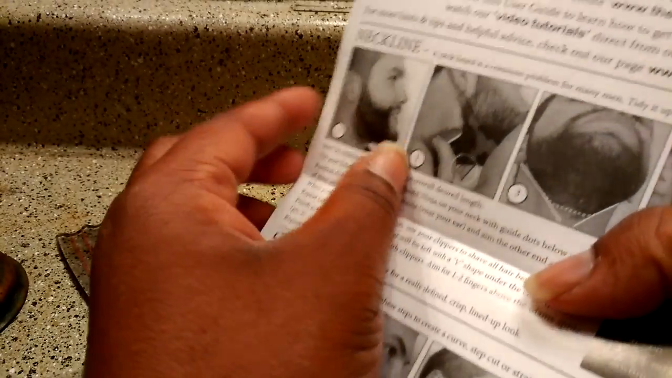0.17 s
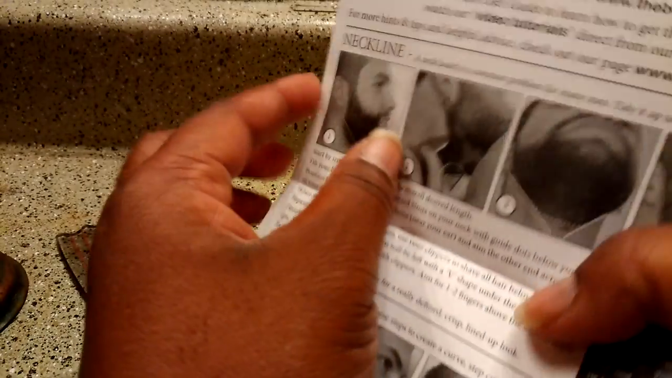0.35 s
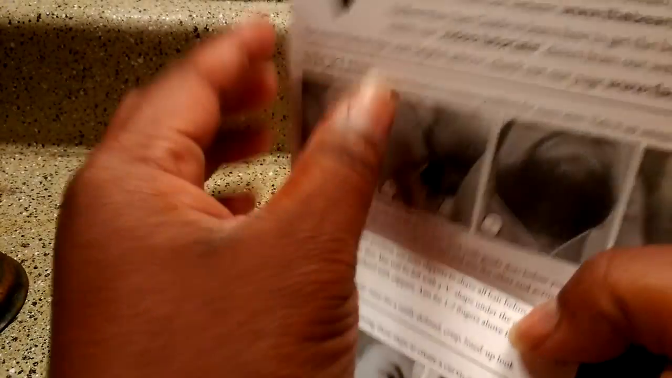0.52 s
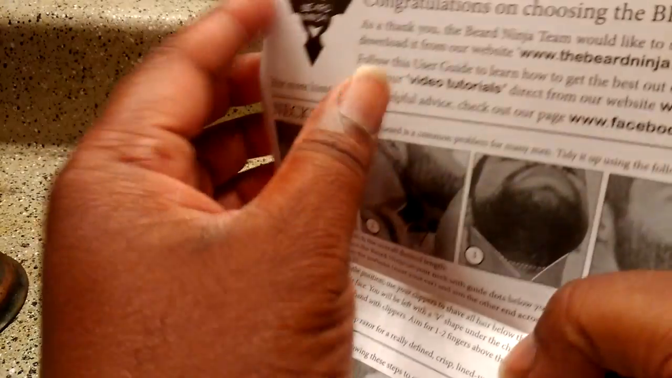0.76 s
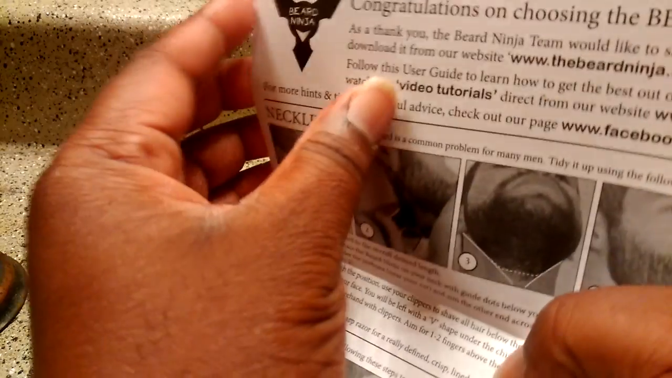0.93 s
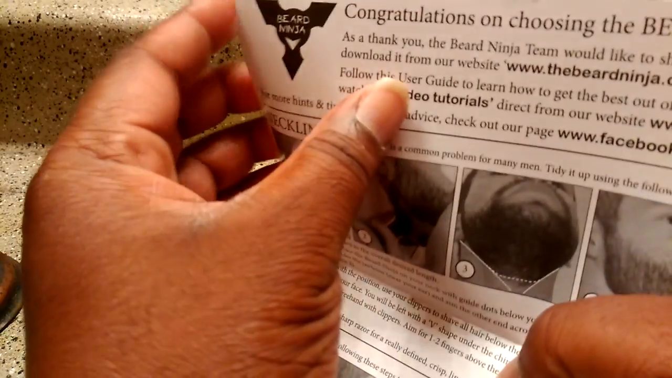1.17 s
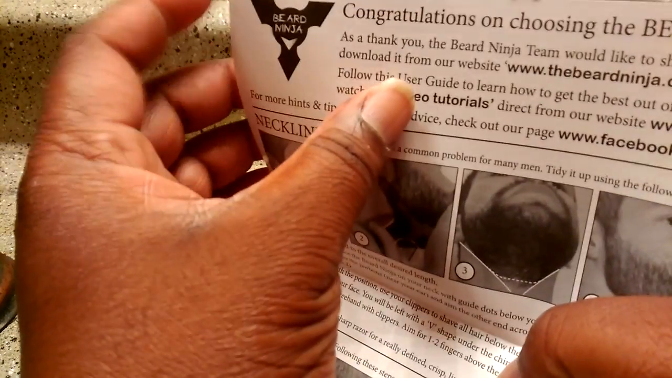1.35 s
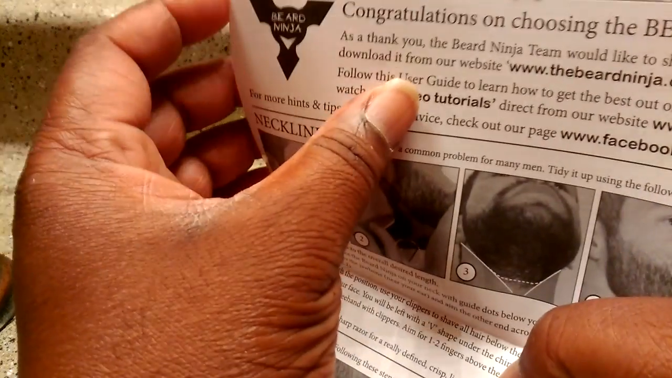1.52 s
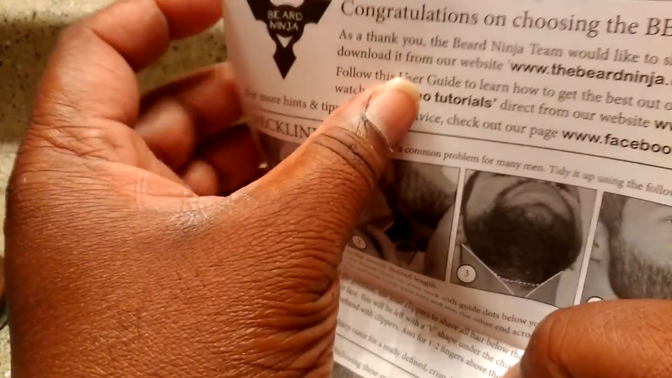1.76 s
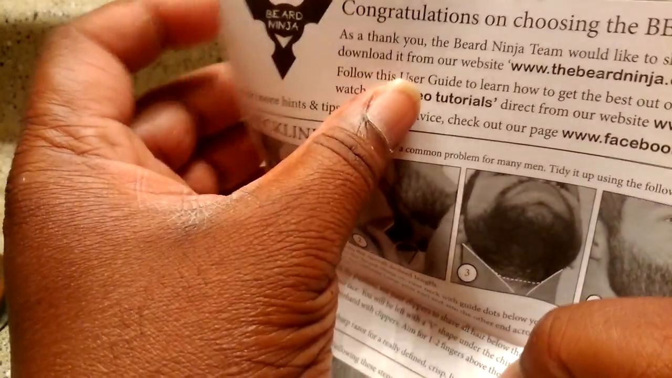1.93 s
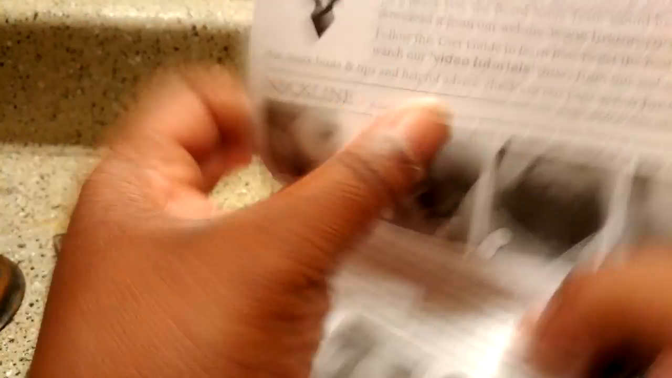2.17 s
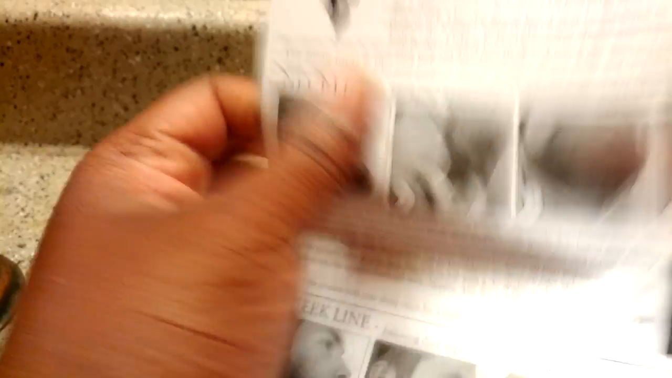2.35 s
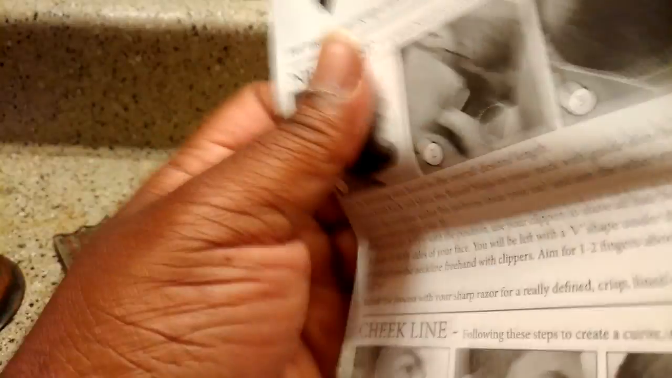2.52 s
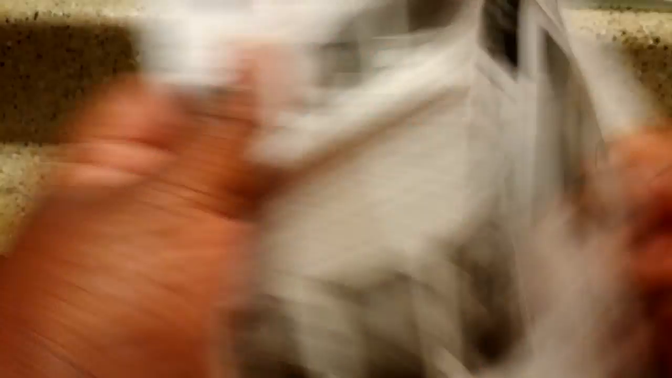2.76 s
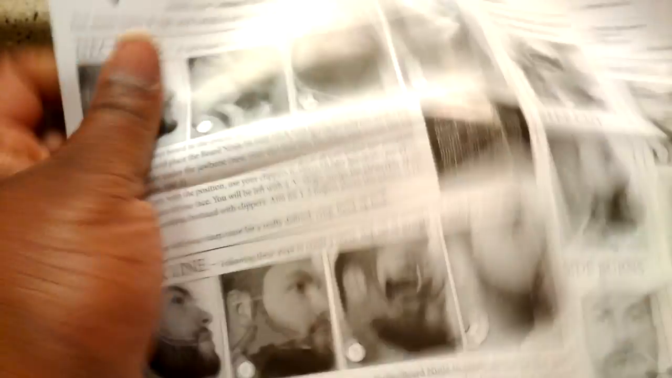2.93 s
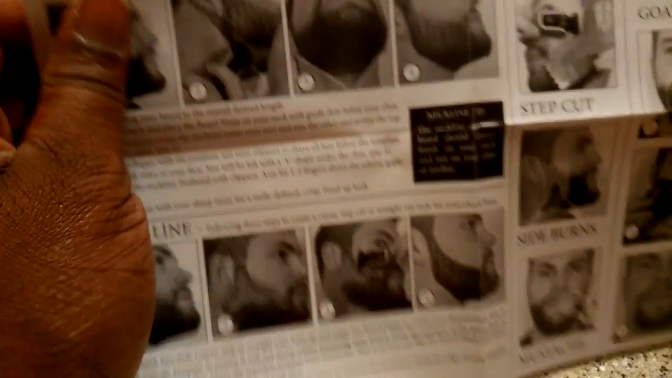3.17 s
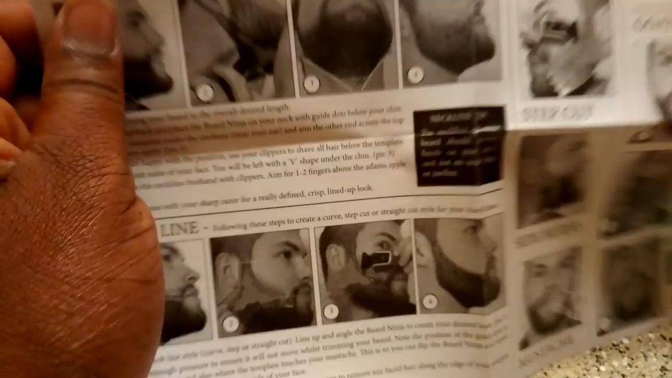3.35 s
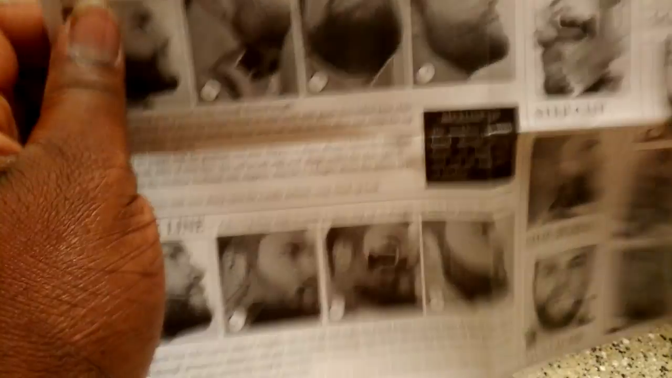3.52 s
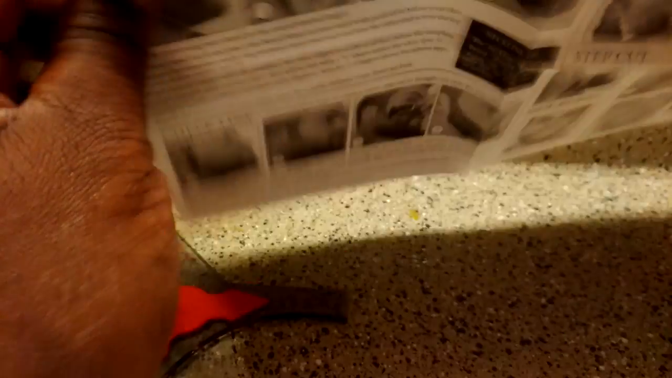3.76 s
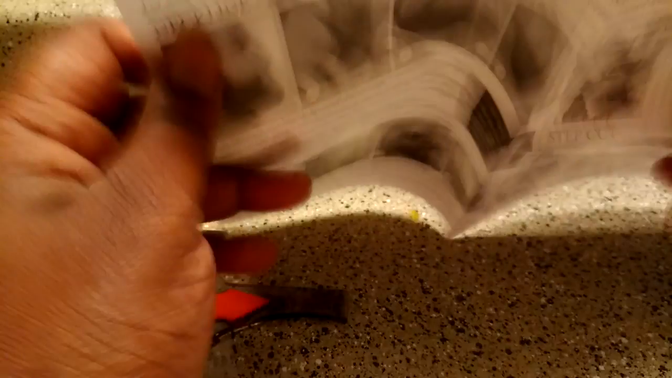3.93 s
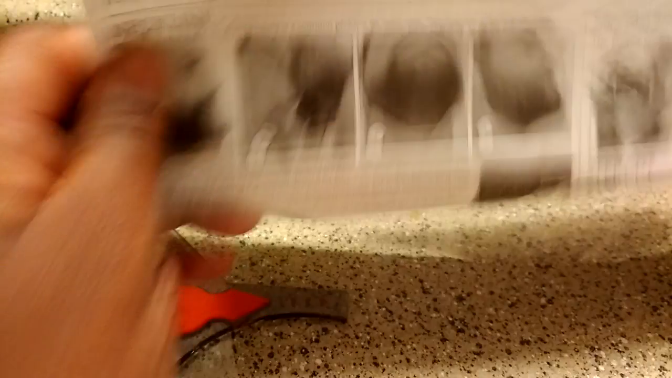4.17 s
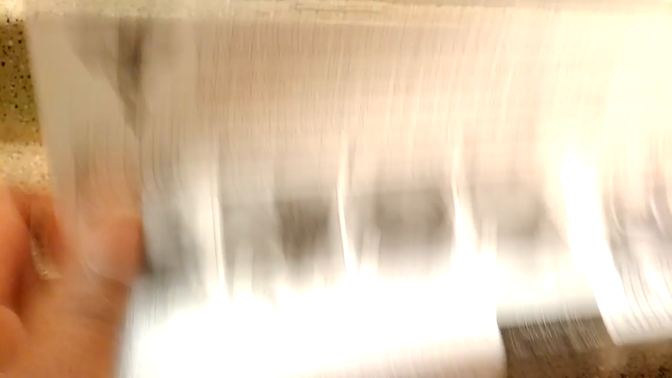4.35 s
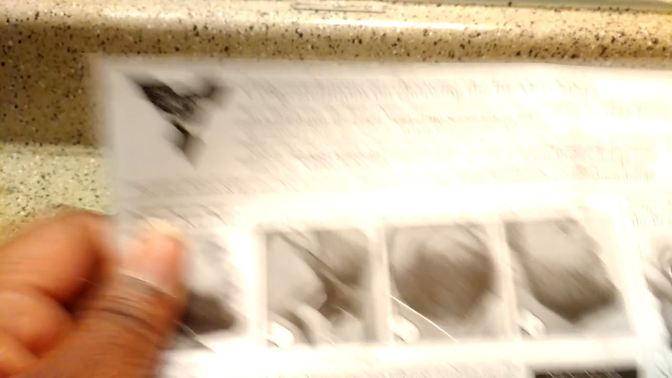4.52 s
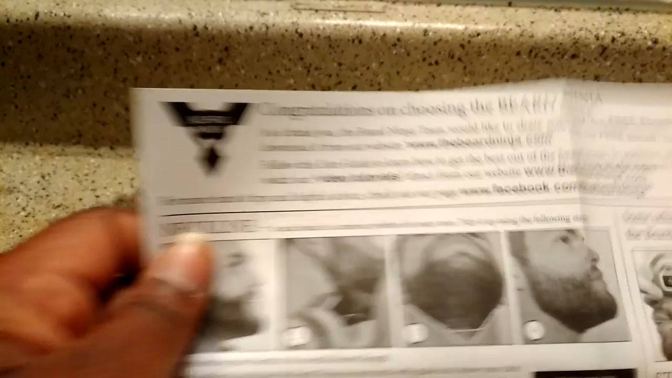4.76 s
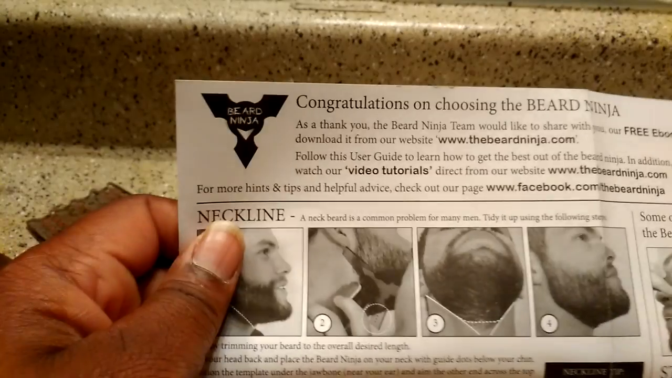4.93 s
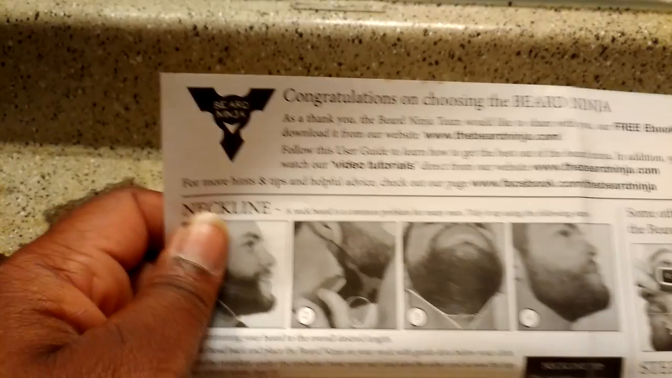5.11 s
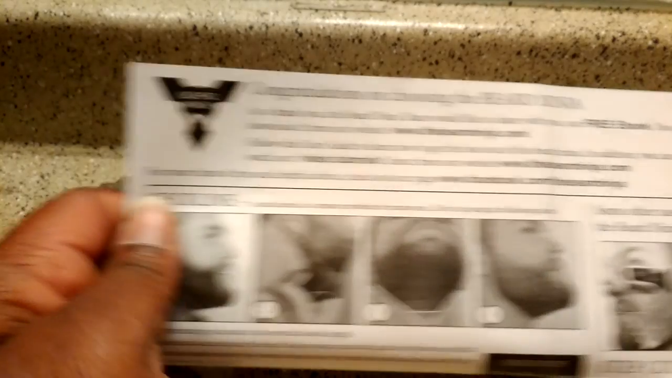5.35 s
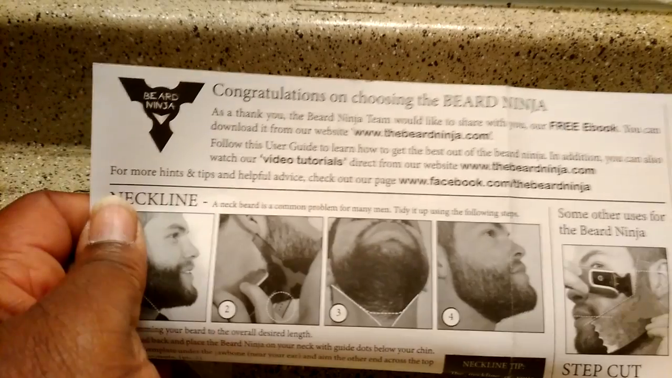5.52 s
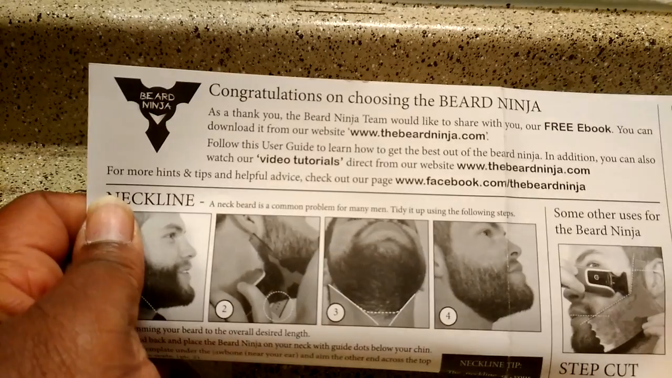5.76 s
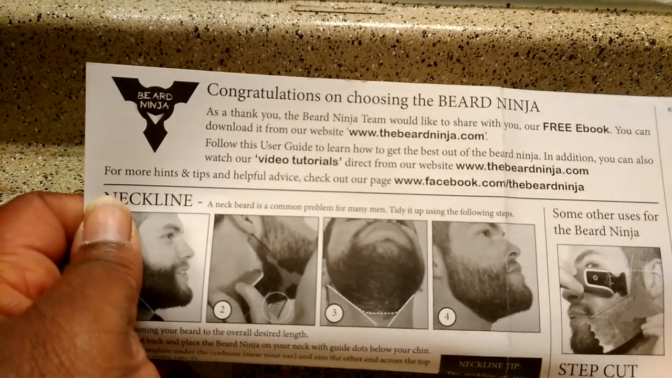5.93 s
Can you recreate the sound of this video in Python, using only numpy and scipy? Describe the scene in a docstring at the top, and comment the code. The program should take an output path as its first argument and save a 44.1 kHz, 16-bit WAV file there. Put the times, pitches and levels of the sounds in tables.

```python
"""Paper leaflet in two hands

Two hands unfold and turn a printed leaflet close to a small two-port recorder in a quiet room.
Rubbing is slip noise, bending is clumped grains through the sheet's modes, flapping is low noise.
Creases snap as short bursts; panels pop as jerks ringing in resonances. The sheet is nearer the left
port: the right hears it later, duller and reversed. Delays echo it over hiss, a hum and a rumble."""
import sys
import numpy as np
from scipy import signal
from scipy.fft import rfft, irfft, next_fast_len
from scipy.io import wavfile

SR = 44100
rng = np.random.default_rng(int(sys.argv[2]) if len(sys.argv) > 2 else 0)


def transcribe(u):
    """Save the signal u as a 16-bit wav file named by the first command-line argument.

    u: samples, shape (n,) or (channels, n), limited to [-1, 1]; the rate is SR.
    q: integer samples, one column per channel.
    """
    v = np.clip(np.atleast_2d(u).T, -1, 1)
    q = np.round(v * 32767).astype(np.int16)
    wavfile.write(sys.argv[1], SR, q)


N = 264065


def paper():
    """One draw of all that the sheet sends out: friction, bending, flapping, snaps and pops."""
    return rubbing() + bending() + flapping() + snaps() + pops()


# moves of the hands: (peak time [s], swell [s], hold [s], rubbing hiss [dB],
# top sheen [dB re hiss], bending rustle [dB])
HAND_MOVES = [(0.102, 0.003, 0, -70, -6, -55.5), (0.216, 0.013, 0.028, -54.5, -31, -75),
              (0.332, 0.025, 0, -53.5, 5.5, -57.5), (0.44, 0.34, 0.23, -88, -12, -67.5),
              (0.639, 0.045, 0.052, -39.5, -0.5, -63), (0.694, 0.11, 0.018, -42.5, -12, -48),
              (0.791, 0.12, 0.21, -69, -11, -66), (1.211, 0.009, 0, -35, 3.5, -49),
              (1.26, 0.003, 0, -40, 3, -69), (1.609, 0.064, 0.021, -39.5, -10, -70),
              (1.738, 0.064, 0.014, -43, -12, -69.5), (1.892, 0.056, 0.014, -35.5, -6.5, -51),
              (1.967, 0.036, 0.016, -28, -3, -56), (2.045, 0.097, 0.041, -23, -5, -35),
              (2.129, 0.041, 0.055, -32, -10, -42.5), (2.253, 0.22, 0.053, -34, -4, -50),
              (2.33, 0.022, 0.0083, -28, -1.5, -33), (2.401, 0.024, 0.062, -32, 0, -38),
              (2.474, 0.029, 0.048, -29.5, -7, -37), (2.579, 0.096, 0.042, -34.5, -2, -32),
              (2.659, 0.038, 0.049, -32.5, 0.5, -39.5), (2.725, 0.017, 0.024, -33.5, -3, -39.5),
              (2.839, 0.12, 0, -23, -8.5, -28), (2.847, 0.011, 0.0033, -16, -15, -24.5),
              (2.907, 0.071, 0.029, -23, -10.5, -27), (2.978, 0.048, 0.072, -32, -5, -36),
              (3.285, 0.012, 0.041, -31.5, -6, -37), (3.448, 0.003, 0, -29.5, -7, -34),
              (3.476, 0.029, 0, -16, -13.5, -28), (3.528, 0.05, 0.049, -55, 8.5, -49),
              (3.619, 0.024, 0.068, -43.5, -44, -48), (3.8, 0.027, 0.042, -37, -2.5, -50),
              (3.847, 0.015, 0.035, -28, 0.5, -31.5), (3.954, 0.039, 0.016, -26, -1.5, -50.5),
              (4.012, 0.014, 0.025, -21.5, -9.5, -33.5), (4.096, 0.0064, 0.047, -25.5, -1.5, -29),
              (4.154, 0.0071, 0.014, -18.5, -20.5, -13), (4.23, 0.43, 0.053, -25, -9, -29.5),
              (4.355, 0.094, 0.033, -18.5, -9.5, -39.5), (4.433, 0.052, 0.094, -42, -2, -79),
              (4.616, 0.013, 0.036, -49.5, -22, -49.5), (4.69, 0.006, 0.089, -48.5, -7, -55.5),
              (4.778, 0.07, 0.095, -34, -1, -64), (4.95, 0.0027, 0.042, -49, 9.5, -68),
              (5.077, 0.0033, 0.023, -41.5, 5, -72), (5.195, 0.02, 0, -45, -21, -37.5),
              (5.26, 0.0081, 0.005, -35.5, -1, -69.5), (5.365, 0.089, 0.012, -58, -6, -58),
              (5.451, 0.026, 0.042, -41.5, -6.5, -57), (5.545, 0.21, 0.0, -62, -16, -48),
              (5.808, 0.0034, 0.021, -56, 8, -84), (5.93, 0.095, 0, -58.5, -8, -71.5)]
SWELL_DB = 30   # climbed during the swell


def move_gain(level_db, fall_db_per_s):
    """Gain of one layer: the powers of all moves added, each swelling to its peak, holding and falling."""
    peak_s, swell_s, hold_s = np.array(HAND_MOVES).T[:3, :, None]
    t = np.arange(0, N, 64) / SR   # one point every 64 samples
    rise_db = SWELL_DB * np.minimum(t - peak_s, 0) / swell_s
    fall_db = fall_db_per_s * np.maximum(t - peak_s - hold_s, 0)
    power = np.sum(from_db(level_db[:, None] + rise_db - fall_db) ** 2, axis=0)
    return np.interp(np.arange(N) / SR, t, np.sqrt(power))


# tone of fingers and folds rubbing: (frequency [Hz], relative density [dB per Hz])
RUB_COLOUR = [(880, -51), (1500, -34.5), (2040, -15), (3000, -11), (3590, -10), (3880, -14.5), (4460, -9.5),
              (5770, -6), (8660, -2), (15100, -14.5), (16000, 2)]
# where the hiss ends and the sheen begins: (frequency [Hz], gain [dB])
BELOW_SHEEN = [(8000, 0), (13000, -30)]
CATCH_DB, CATCH_RATE_HZ = 1.8, 120   # the fingers catch and slip unevenly
HISS_FALL_DB_PER_S, SHEEN_FALL_DB_PER_S = 272.5, 293


def rubbing():
    """Friction slips split into hiss and top sheen, with small creases giving way under the fingers."""
    hiss_db, sheen_re_hiss_db = np.array(HAND_MOVES).T[3:5]
    slips = rms_one(colour(patchy(grains(4000, 2.0, 4.6)), RUB_COLOUR))
    slips = slips * from_db(CATCH_DB * drift(CATCH_RATE_HZ))
    hiss = colour(slips, BELOW_SHEEN)
    sheen = rms_one(slips - hiss)
    rub = (hiss + 0.21 * crinkles(270)) * move_gain(hiss_db, HISS_FALL_DB_PER_S)
    return rub + sheen * move_gain(hiss_db + sheen_re_hiss_db, SHEEN_FALL_DB_PER_S)


def grains(per_s, spread_db, clump_db):
    """Tiny slips at random times and sizes, coming in clumps, over a smooth friction noise."""
    sizes = from_db(spread_db * np.minimum(rng.exponential(1, N), 4)) * rng.choice([-1, 1], N)
    born = rng.random(N) < per_s * from_db(clump_db * drift(40)) / SR
    return rms_one(sizes * born) + 1.5 * rng.standard_normal(N)


PATCH_DB, PATCH_RATE_HZ = 2.8, 18   # the colour shifts as the touching area moves


def patchy(x):
    """Fourteen narrow resonances swell and fade, each in its own time."""
    gains = from_db(PATCH_DB * np.array([drift(PATCH_RATE_HZ) for _ in range(4)]))
    out = np.zeros(N)
    for k, hz in enumerate(np.geomspace(900, 14000, num=14)):
        gain = np.roll(gains[k % 4], 30011 * k)   # four drifts, shifted apart in time
        out += (-1) ** k * gain * resonance(x, hz, 0.16 * hz)
    return rms_one(out)


def crinkles(per_s):
    """Small creases give way at random, each ringing a few cycles at one of eight pitches."""
    sizes = from_db(7.3 * np.minimum(rng.exponential(1, N), 3)) * (rng.random(N) < per_s / SR)
    dealt = rng.integers(0, 8, N)
    out = np.zeros(N)
    for k, hz in enumerate(np.geomspace(1500, 11000, 8)):
        out += resonance(sizes * (dealt == k) + 1e-18, hz, 0.41 * hz)   # the tiny offset avoids denormals
    return rms_one(out)


# tone of the bending rustle: (frequency [Hz], relative density [dB per Hz])
BEND_COLOUR = [(200, 5), (400, 2), (900, 9.5), (1500, 8.5), (2500, 1), (4000, 2.5), (8000, -61)]
BEND_FALL_DB_PER_S = 294.5


def bending():
    """Bending makes sparse, strongly clumped grains that excite the sheet's modes."""
    bend_db = np.array(HAND_MOVES).T[5]
    rustle = rms_one(colour(sheet_modes(grains(600, 6.9, 8.2), 0.71), BEND_COLOUR))
    return rustle * from_db(3.02 * drift(28)) * move_gain(bend_db, BEND_FALL_DB_PER_S)


# modes of the held sheet: (frequency [Hz], width [Hz], level [dB])
SHEET_MODES = [(346, 48, 14), (587, 140, 9.5), (776, 54, -1.5), (1340, 35, 8), (2330, 350, -6.5)]


def sheet_modes(x, share):
    """The sheet's modes added, with alternating sign, onto whatever excites it."""
    ringing = 0
    for k, (hz, width_hz, level_db) in enumerate(SHEET_MODES):
        ringing = ringing + (-1) ** k * from_db(level_db) * resonance(x, hz, width_hz)
    return x + share * ringing


# tone of the air pushed by the sheet: (frequency [Hz], relative density [dB per Hz])
FLAP_COLOUR = [(20, -34), (45, 6), (70, -1), (130, 0), (250, -1.5), (500, -6), (1000, -40)]
# low flapping of the open sheet: (time [s], level [dB])
FLAP_LEVEL = [(0, -90), (1.9, -70.5), (2.09, -69), (2.3, -63.5), (2.53, -48), (2.61, -30.5), (2.78, -58),
              (2.83, -32.5), (3.1, -37.5), (3.2, -65), (3.45, -69.5), (3.75, -90), (3.86, -30), (4.06, -61),
              (4.15, -23), (4.58, -54.5), (4.65, -42), (4.93, -78), (5.16, -56.5), (5.2, -30.5), (5.3, -76),
              (5.56, -45.5), (5.7, -83), (5.91, -62.5), (5.98, -83)]


def flapping():
    """The open sheet pushes air: low noise of wavering strength."""
    air = rms_one(colour(rng.standard_normal(N), FLAP_COLOUR))
    return air * from_db(3 * drift(12)) * from_db(in_time(FLAP_LEVEL))


# creases that buckle: (time [s], crack peak [dB], sheet knock peak [dB])
CREASE_SNAPS = [(0.2204, -35, -60), (0.33, -44.5, -62), (0.642, -21, -40), (0.676, -21, -37),
                (1.038, -37.5, -62), (1.2092, -26, -36), (1.223, -27, -43), (1.7436, -27, -53),
                (1.966, -32, -29), (2.1361, -8, -18.5), (2.1494, -6.5, -15.5), (2.161, -26, -18),
                (2.287, -25, -41), (2.331, -11, -17), (2.4056, 6.5, -6.5), (2.4584, -4.5, -17.5),
                (2.567, -18, -27), (2.676, -12.5, -27), (2.7302, -8.5, -19.5), (2.826, -31, -11.5),
                (2.8494, 5, -2), (2.917, -19, -15), (2.992, -15, -36), (3.284, -19, -4.5),
                (3.4488, -13, -30), (3.5858, -25, -56), (3.8443, -17, -10.5), (3.895, -11, -20.5),
                (3.955, -20, -31), (4.012, -19, -15), (4.098, -20, -38), (4.154, 7.5, 8),
                (4.2287, -5.5, -9), (4.35, 12.5, -6), (4.519, -25.5, -59), (4.601, -32.5, -66),
                (4.637, -41, -50), (4.6916, -29.5, -55), (4.7573, -26, -46), (4.784, -7.5, -28),
                (4.815, -29, -43), (4.833, -16.5, -47), (4.8395, -23, -52), (4.858, -22, -48),
                (4.869, -14.5, -60), (4.901, -20.5, -49), (4.9492, -26, -51), (4.97, -37, -61),
                (5.057, -27.5, -42), (5.081, -18.5, -39.5), (5.109, -26, -48), (5.1843, -28, -42),
                (5.4317, -38, -62), (5.4494, -16.5, -58), (5.488, -24, -45), (5.8137, -32, -56.5)]
CLICK_T60_S, CRACK_T60_S, KNOCK_T60_S = 0.0024, 0.015, 0.027


def snaps():
    """Each buckle is a sharp click and a burst that dies fast, over a knock of the sheet."""
    length = round(.12 * SR)
    t = np.arange(length) / SR
    noise = rng.standard_normal((len(CREASE_SNAPS), 2, length))
    click = np.sign(noise[:, 0]) * from_db(-60 * t / CLICK_T60_S)   # the crease gives way at full strength
    crack_burst = noise[:, 0] * from_db(-60 * t / CRACK_T60_S)
    knock_burst = noise[:, 1] * from_db(-60 * t / KNOCK_T60_S)
    cracks = band(click + crack_burst, 4600, 10000)
    knocks = band(sheet_modes(click + knock_burst, 0.79), 800, 3900)
    out = np.zeros(N + length)
    for (s, crack_db, knock_db), crack, knock in zip(CREASE_SNAPS, cracks, knocks):
        at = round(s * SR)
        out[at:at + length] += from_db(crack_db) * crack / np.max(np.abs(crack))
        out[at:at + length] += from_db(knock_db) * knock / np.max(np.abs(knock))
    return out[:N]


# panels that pop in or out, the widest ones lowest:
# (time [s], peak [dB], pitch [Hz], t60 of the shaking [s])
PANEL_POPS = [(0.106, -44.5, 1050, 0.051), (0.339, -48, 680, 0.19), (0.408, -46.5, 1370, 0.094),
              (0.472, -54, 1400, 0.13), (0.699, -40.5, 497, 0.026), (0.702, -37, 1500, 0.04),
              (0.96, -53, 1450, 0.068), (0.965, -58, 376, 0.41), (1.075, -48, 362, 0.16),
              (1.221, -37.5, 415, 0.21), (1.596, -48, 1910, 0.34), (1.735, -44, 1930, 0.14),
              (2.03, -32.5, 394, 0.35), (2.089, -29, 326, 0.034), (2.568, -24, 240, 0.022),
              (2.596, -22, 150, 0.15), (2.588, -8, 348, 0.042), (2.638, -24.5, 71, 0.043),
              (2.728, -30, 360, 0.14), (2.824, -19, 1440, 0.016), (2.845, -19.5, 1060, 0.097),
              (2.904, -14.5, 167, 0.045), (2.912, -18, 360, 0.058), (3.002, -26, 533, 0.095),
              (3.149, -27.5, 920, 0.042), (3.284, -12.5, 1340, 0.049), (3.285, -16, 2300, 0.033),
              (3.29, -21.5, 385, 0.017), (3.527, -25, 840, 0.019), (3.611, -19.5, 552, 0.029),
              (3.613, -33.5, 56, 0.088), (3.629, -24, 594, 0.31), (3.843, -12.5, 425, 0.016),
              (3.858, -20.5, 600, 0.18), (4.016, -18, 385, 0.07), (4.097, -21, 540, 0.46),
              (4.142, -21, 109.5, 0.067), (4.156, -3, 620, 0.041), (4.167, -7.5, 1250, 0.1),
              (4.227, -5.5, 584, 0.042), (3.942, -25.5, 680, 0.076), (4.348, -13, 603, 0.15),
              (4.491, -29.5, 554, 0.098), (4.611, -28, 690, 0.15), (4.632, -25, 329, 0.1),
              (4.69, -34, 157, 0.11), (4.743, -29.5, 587, 0.055), (4.869, -32, 1340, 0.12),
              (5.194, -19, 587, 0.1), (5.194, -19, 2430, 0.026), (5.449, -39, 1300, 0.042),
              (5.515, -31, 650, 0.21), (5.528, -22, 474, 0.086), (5.53, -31.5, 213, 0.13),
              (5.531, -30, 1285, 0.04), (5.558, -24, 416, 0.021), (5.928, -41.5, 2304, 0.031)]
POP_SHARPNESS = 2.5   # pitch over width
FIRST_JERK = 0.82   # strength of the flip itself, before it is scaled up for low pitches


def pops():
    """A panel flips over in a few jerks and rings near its own pitch, with a looser overtone."""
    length = round(.3 * SR)
    t = np.arange(length) / SR
    fade_out = np.minimum(1, (length - np.arange(length)) / 2000)
    noise = rng.standard_normal((len(PANEL_POPS), length))
    out = np.zeros(N + length)
    for (s, peak_db, hz, t60), jerks in zip(PANEL_POPS, noise):
        at = round(s * SR)
        push = jerks * from_db(-60 * t / t60)
        push[0] += FIRST_JERK * np.sqrt(SR / hz)
        ring = resonance(resonance(push, hz, hz / POP_SHARPNESS), hz, 0.4 * hz)
        overtone = resonance(resonance(push, 1.6 * hz, 0.54 * hz), 1.6 * hz, 0.54 * hz)
        ring = ring + 0.21 * overtone
        out[at:at + length] += from_db(peak_db) * ring / np.max(np.abs(ring)) * fade_out
    return out[:N]


ROOM_T60_S, ROOM_CUT_HZ, ROOM_DB = 0.19, 6300, -20   # t60 before the dulling


def room(x):
    """Echo of the room: eight feedback delays a side, duller on every round."""
    size = next_fast_len(N + SR)
    w = 2 * np.pi * np.arange(size // 2 + 1) / size
    dull = 1 / (1 + 1j * w * SR / (2 * np.pi * ROOM_CUT_HZ))
    out = np.zeros((2, len(w)), complex)
    for k, lag in enumerate(rng.uniform(0.0042, 0.016, 16) * SR):
        loop = from_db(-60 * lag / SR / ROOM_T60_S) * dull * np.exp(-1j * w * lag)
        out[k % 2] += loop / (1 - loop) * (-1) ** (k // 2)
    return irfft(out * rfft(x, size), size)[:, :N]


# tone of the background hiss: (frequency [Hz], relative density [dB per Hz])
FLOOR_COLOUR = [(18, -39), (30, -17.5), (157, -10), (303, -14.5), (437, -17.5), (937, -24), (1350, -16.5),
                (3670, -20.5), (8740, -14), (16000, -22)]
# level of the background hiss and hum, rising and falling: (time [s], level change [dB])
FLOOR_LEVEL = [(0, 7), (1.15, 3.5), (1.45, -1.5), (3.2, 7.5), (5.5, 1.5), (5.99, -14)]
FLOOR_DB = -66.5   # hiss level before the level curve


def room_hiss():
    """Noise of one fixed colour, mostly of its own at each port."""
    shared, own = rng.standard_normal(N), rng.standard_normal((2, N))
    hiss = rms_one(colour(shared + 9.0 * own, FLOOR_COLOUR))
    return from_db(FLOOR_DB + in_time(FLOOR_LEVEL)) * hiss


# a deep rumble in the room comes and goes: (time [s], level [dB])
RUMBLE_LEVEL = [(0, -64), (.25, -60), (.5, -70), (.84, -66), (.88, -53.5), (1.42, -60), (1.5, -82),
                (1.62, -64), (1.66, -49), (1.74, -65), (1.85, -60), (2.3, -55), (5.6, -71.5), (5.98, -50.5)]
RUMBLE_LOW_HZ, RUMBLE_HIGH_HZ = 40.2, 76
HUM_HZ, HUM_WIDTH_HZ, HUM_DB = 157, 30, -70   # level before the waver and the level curve
HUM_WAVER_DB, HUM_WAVER_RATE_HZ = 3.0, 7
IN_STEP_DB = -8.5   # part that reaches the ports in step, re the reversed part


def room_bass():
    """A wavering hum and a rumble from filtered noise, mostly reversed between the ports."""
    noise = rng.standard_normal((2, N))
    hum = rms_one(resonance(resonance(noise, HUM_HZ, HUM_WIDTH_HZ), HUM_HZ, HUM_WIDTH_HZ))
    rumble = band(band(noise, RUMBLE_LOW_HZ, RUMBLE_HIGH_HZ), RUMBLE_LOW_HZ, RUMBLE_HIGH_HZ)
    hum_db = HUM_DB + HUM_WAVER_DB * drift(HUM_WAVER_RATE_HZ) + in_time(FLOOR_LEVEL)
    reverse, in_step = from_db(hum_db) * hum + from_db(in_time(RUMBLE_LEVEL)) * rms_one(rumble)
    return from_db(IN_STEP_DB) * in_step + reverse * [[1], [-1]]


def from_db(db):
    """Decibels to gain."""
    return 10 ** (np.asarray(db) / 20)


def rms_one(x):
    """Scale to unit rms."""
    return x / np.sqrt(np.mean(x ** 2) + 1e-20)


def in_time(rows):
    """A (time [s], value) curve at every sample."""
    return np.interp(np.arange(N) / SR, *np.transpose(rows))


def drift(rate_hz):
    """Slow chance of spread 1: noise through two low-pass poles at the rate."""
    r = np.exp(-2 * np.pi * rate_hz / SR)
    noise = rng.standard_normal(N + SR)   # the first second lets the filter settle
    return rms_one(signal.lfilter([1], [1, -2 * r, r * r], noise)[SR:])


def colour(x, points, lag=((0, 0), (1, 0))):
    """Filter by a (frequency [Hz], gain [dB]) curve and a (frequency [Hz], lag [radians]) curve."""
    size = next_fast_len(N + 4096)
    hz = np.maximum(np.arange(size // 2 + 1) * SR / size, 1)
    table = np.array(points, float)
    gain = from_db(np.interp(np.log(hz), np.log(table[:, 0]), table[:, 1]))
    turn = np.exp(-1j * np.interp(hz, *np.transpose(lag)))
    return irfft(rfft(x, size) * gain * turn, size)[..., :N]


def band(x, low_hz, high_hz):
    """Causal band-pass."""
    return signal.sosfilt(signal.butter(2, [low_hz, high_hz], "band", fs=SR, output="sos"), x)


def resonance(x, hz, width_hz):
    """Two-pole resonance with a gain near 1 at its pitch, never narrower than 30 Hz."""
    r = np.exp(-np.pi * max(width_hz, 30) / SR)
    zeros = (1 - r * r) / 2 * np.array([1, 0, -1])
    return signal.lfilter(zeros, [1, -2 * r * np.cos(2 * np.pi * hz / SR), r * r], x)


# the sheet swings towards the right port and away: (time [s], gain at the right port [dB])
SHEET_SWING = [(1.9, 0.5), (2.56, 1), (2.595, 6), (2.66, 0.5), (3.3, -3.5), (4.3, -2), (4.7, -1)]
# part of the right port's paper sound shared with the left: (frequency [Hz], level [dB])
SAME_AT_BOTH = [(60, -3), (300, -2.5), (2000, -5), (10000, -10)]
# shadow of the recorder body: (frequency [Hz], left over right [dB])
LEFT_OVER_RIGHT = [(60, -2.5), (110, -3.5), (200, 2), (380, 5.5), (700, 7), (1290, 1.5), (2380, 12),
                   (4400, 11.5), (8120, 20), (15000, 25)]
# path round the body to the right port: (frequency [Hz], lag [radians])
RIGHT_LAG = [(0, 0), (1290, 1.3), (3530, 6.9), (6030, 15.3), (22050, 60)]


def scene():
    """Paper, its echo and the background hiss and bass, as they reach the two ports."""
    # two independent draws of the paper noise, so the two ports hear it only partly alike
    left_paper, other_paper = paper(), paper()
    surround = from_db(ROOM_DB) * room(left_paper) + room_hiss()
    # the unshared part makes up the rest of the power
    unshared = [(hz, 10 * np.log10(1 - from_db(2 * level_db))) for hz, level_db in SAME_AT_BOTH]
    right_paper = colour(left_paper, SAME_AT_BOTH) + colour(other_paper, unshared)
    right = from_db(in_time(SHEET_SWING)) * right_paper + surround[1]
    shadow = [(hz, -level_db) for hz, level_db in LEFT_OVER_RIGHT]
    ports = np.array([left_paper + surround[0], -colour(right, shadow, RIGHT_LAG)])
    return ports + room_bass()


CUTOFF_HZ = 15950


def record(dry):
    """The capsules lose the deepest bass, the loudest peaks clip, the top is cut."""
    dry = signal.sosfilt(signal.butter(2, 40, "high", fs=SR, output="sos"), dry)
    clipped = np.clip(dry, -.82, .82)
    return signal.sosfilt(signal.ellip(10, .5, 70, CUTOFF_HZ, fs=SR, output="sos"), clipped)


dry = scene()
out = record(dry)
transcribe(out)
```